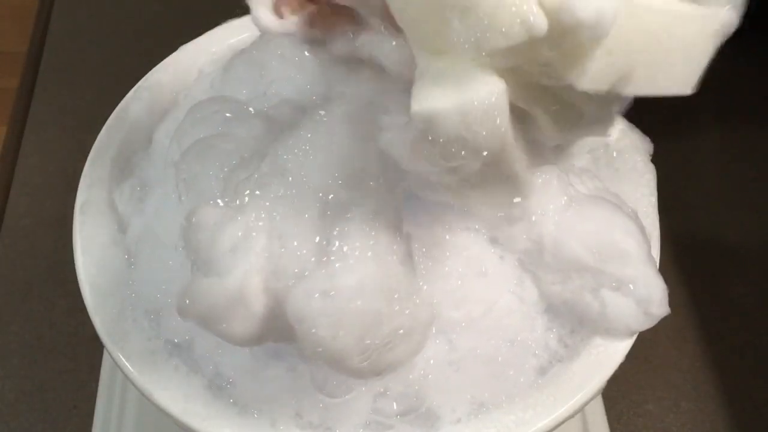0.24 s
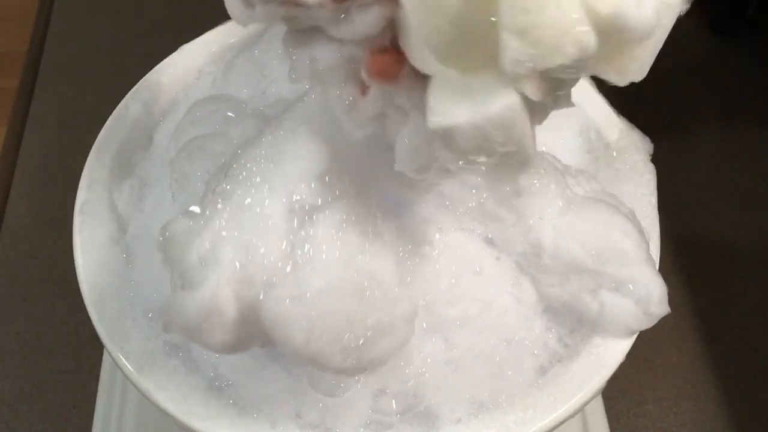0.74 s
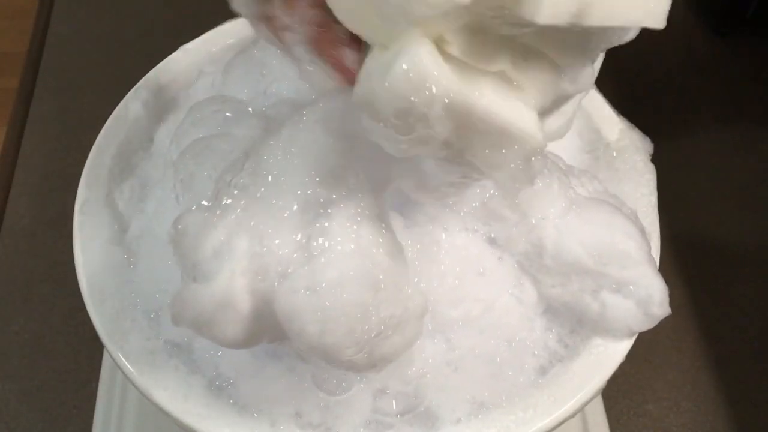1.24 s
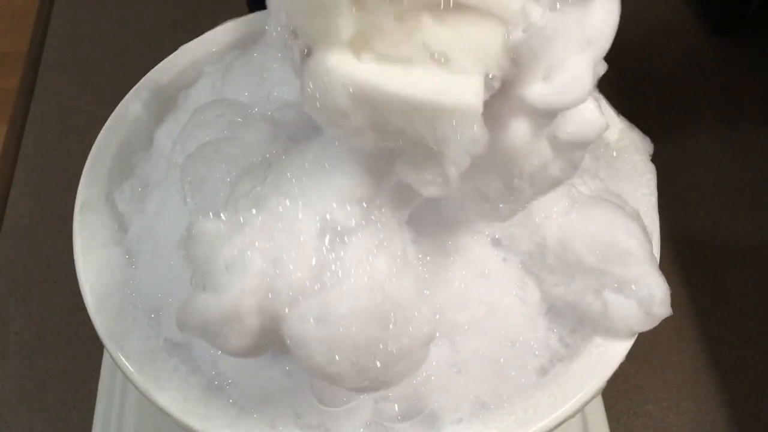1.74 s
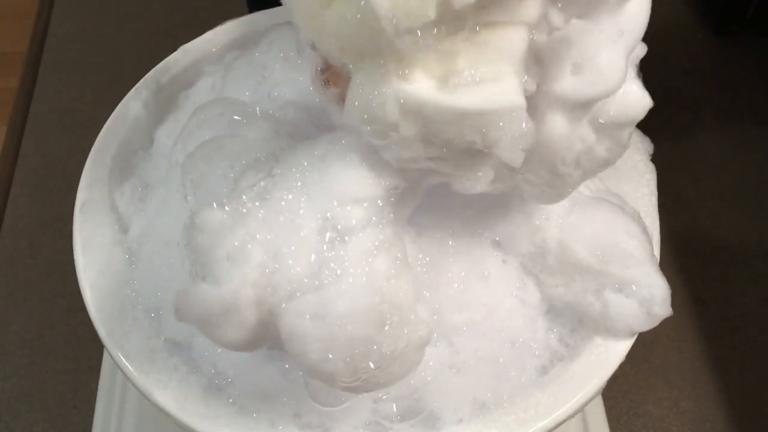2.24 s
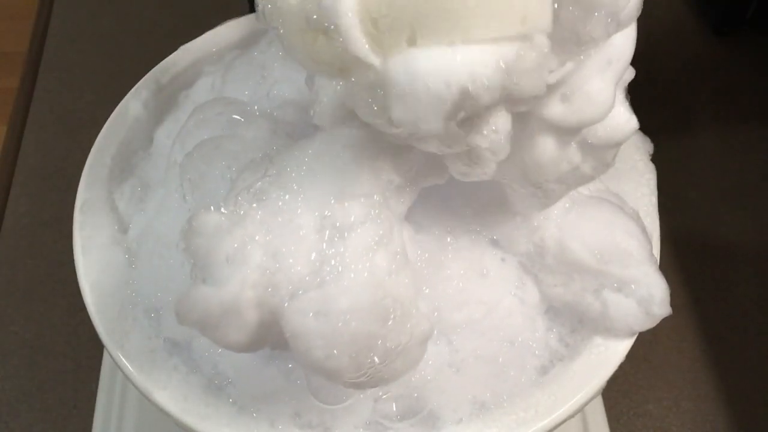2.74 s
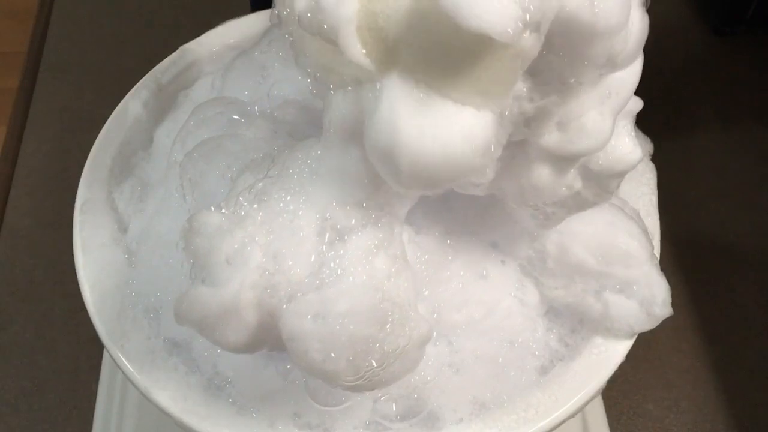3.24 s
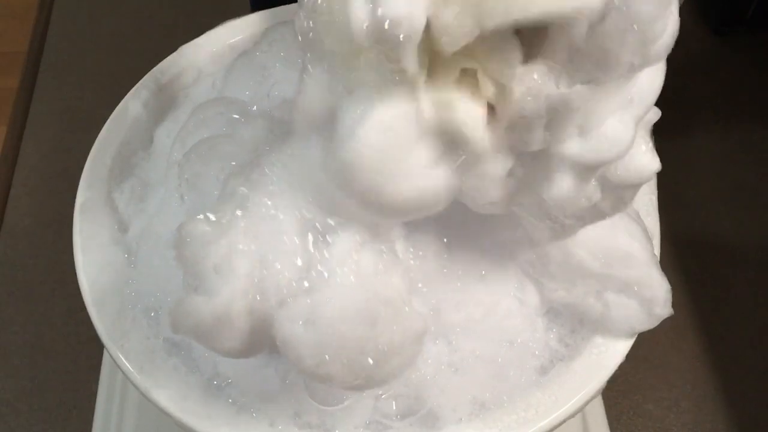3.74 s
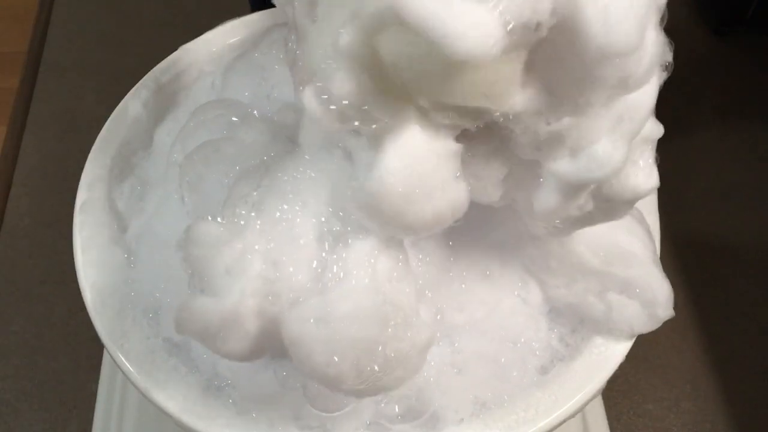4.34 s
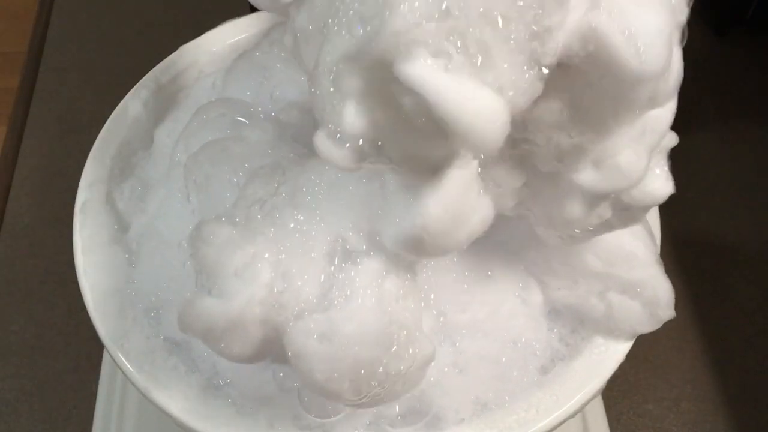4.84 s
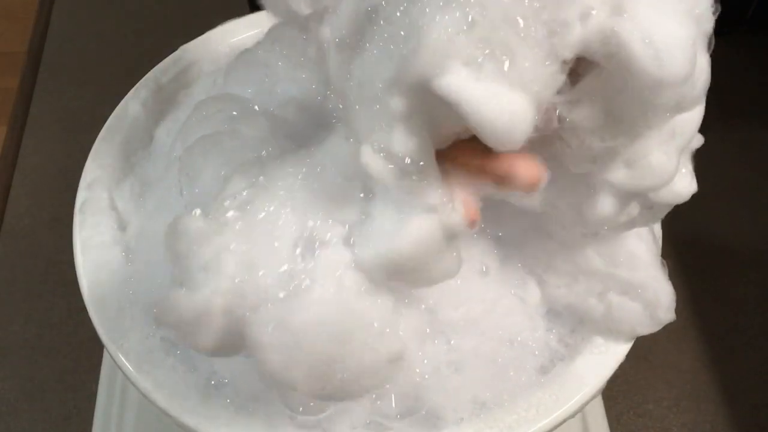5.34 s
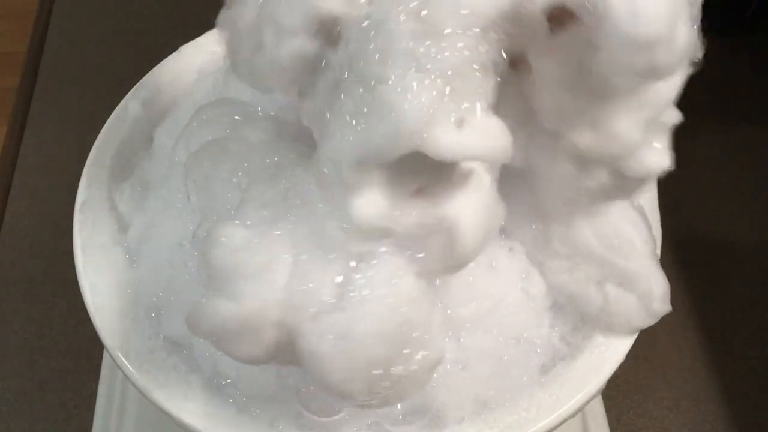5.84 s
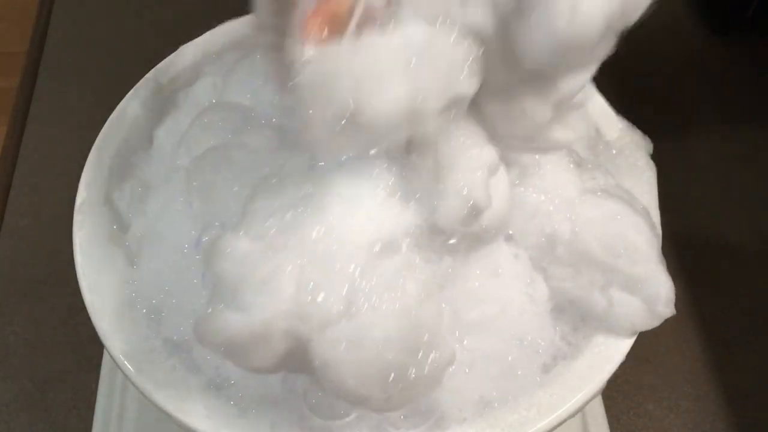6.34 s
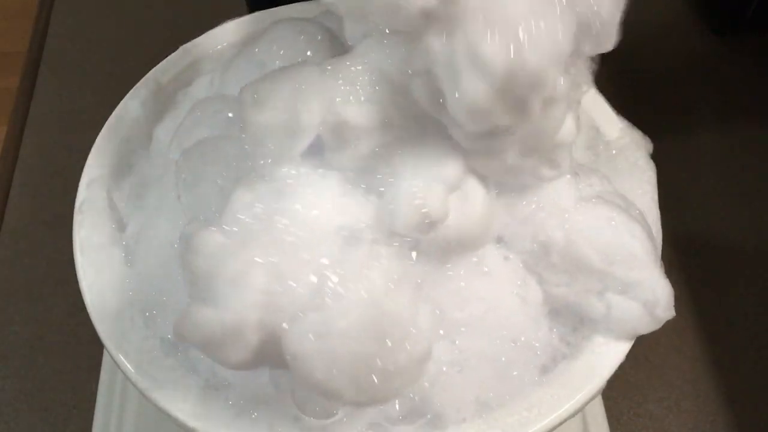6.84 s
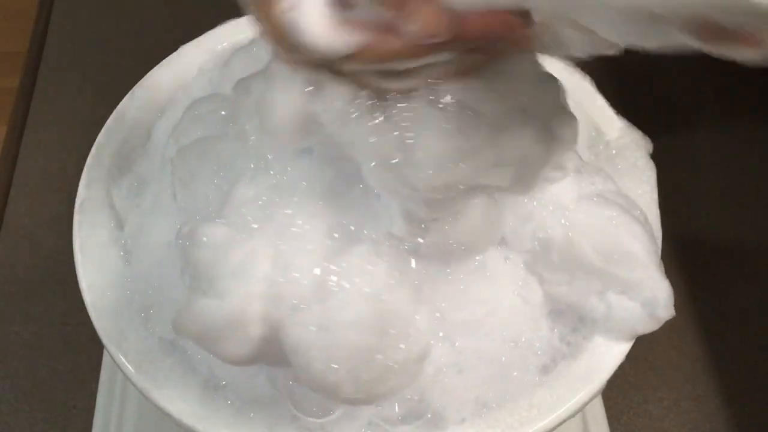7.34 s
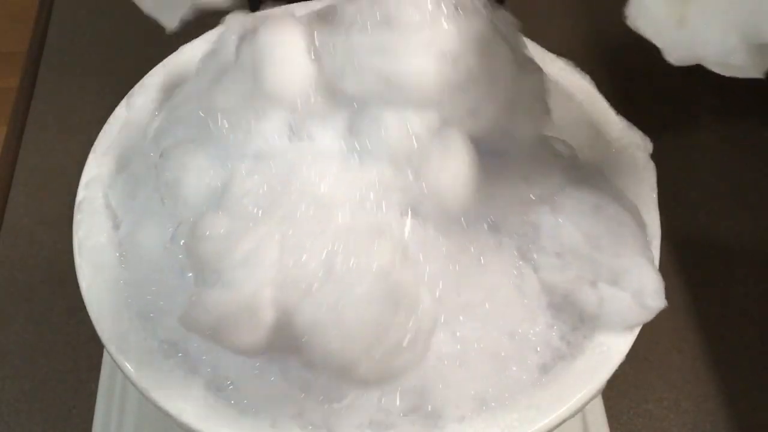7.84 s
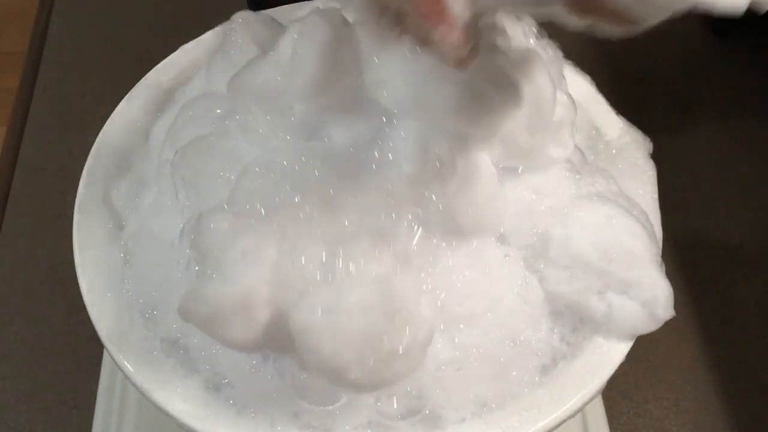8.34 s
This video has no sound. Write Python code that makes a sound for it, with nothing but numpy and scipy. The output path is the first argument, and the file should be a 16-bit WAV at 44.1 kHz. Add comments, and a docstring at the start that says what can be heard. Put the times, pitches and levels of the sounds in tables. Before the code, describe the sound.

Hand kneading a soaked sponge in thick lather up close, fizzing foam, wet squelches, scattered bubble pops and sharp clicks over a faint low hum.

```python
"""A hand kneads a wet sponge in thick lather, close by, while a machine hums from start to end.
From the first moment tiny bubbles burst as a bright fizz, suds squelch through the pores, and the grip thuds
softly; quick trains of small pops soon flutter or sing. Then air pockets pop one by one, and jets of foam hiss.
Later, hollows plop. The densest pops come at about 3.4 and 4.5 s; the last two seconds have few pops.
Bubbles are coloured random clicks, pockets are short ringing tones, and the hum is two sine waves."""
import sys
import numpy as np
from scipy import signal
from scipy.fft import rfft, irfft, next_fast_len
from scipy.io import wavfile
from scipy.ndimage import map_coordinates

SR = 44100
rng = np.random.default_rng(int(sys.argv[2]) if len(sys.argv) > 2 else 0)


def materialize(psi):
    """Save the field psi as 16-bit PCM at rate SR to the path in sys.argv[1].

    A 1-D psi becomes a single channel; in a 2-D psi each row is a channel.
    """
    bounded = np.clip(np.atleast_2d(psi).T, -1, 1)
    quanta = np.round(bounded * 32767).astype(np.int16)
    wavfile.write(sys.argv[1], SR, quanta)


N = 378819  # length in samples

# The machine's hum. Each row: time in seconds, level in dB.
HUM = [(0, -56.5), (4.3, -56), (4.4, -57.5), (7.55, -59), (7.65, -56.5), (8.59, -55.5)]
HUM_HZ = 59
# The sound colour of the quiet room. Each row: frequency in Hz, relative level in dB.
AIR_COLOUR = [(20, -5), (40, 0), (100, 4), (200, -1), (500, -6), (1300, -19), (3000, -26), (7600, -20),
              (15800, -13)]

# Squeezes of the hand. Each row: peak time in seconds, fine fizz level in dB, coarse froth level in dB,
# squelch level in dB, rise in seconds over 10 dB, fall in seconds over 10 dB (before DRAIN for the squelch).
SQUEEZES = [(0.021, -48, -54, -57, 0.079, 0.065), (.215, -52.5, -53, -54, 0.15, 0.16),
            (.37, -54.5, -54, -67, 0.07, 0.091), (.463, -53.5, -53.5, -57, 0.055, 0.21),
            (.587, -51.5, -49.5, -51, 0.044, 0.055), (.807, -57, -60.5, -62.5, 0.068, 0.22),
            (1.019, -62.5, -58.5, -65, 0.036, 0.12), (1.239, -50, -49.5, -52, 0.096, 0.063),
            (1.382, -59.5, -60, -56.5, 0.044, 0.082), (1.553, -57.5, -55.5, -53, 0.11, 0.14),
            (1.762, -64.5, -62, -60.5, 0.068, 0.085), (2.2, -64, -64, -66, 0.055, 0.21),
            (2.43, -56.5, -56.5, -62.5, 0.27, 0.18), (2.693, -58.5, -55, -64, 0.22, 0.36),
            (3.115, -62, -64.5, -60, 0.19, 0.33), (3.53, -84, -80, -51.5, 0.37, .3),
            (3.685, -50.5, -51, -48, 0.037, 0.046), (3.745, -67, -61, -56, .04, 0.18),
            (4.023, -65, -62, -55, 0.052, 0.47), (4.263, -53, -51.5, -58, 0.053, 0.077),
            (4.416, -53, -56.5, -54.5, 0.21, .1), (4.509, -47.5, -45, -39, 0.043, 0.049),
            (5.1, -80, -60.5, -51.5, 0.062, 0.11), (5.198, -58, -64, -51, 0.033, 0.057),
            (5.443, -61, -60.5, -55.5, 0.21, 0.039), (5.523, -70, -70, -51, 0.072, 0.11),
            (5.71, -79, -80, -51.5, 0.054, 0.26), (5.78, -65.5, -65.5, -54.5, .2, .4),
            (5.95, -54, -57.5, -72, 0.19, 0.14), (6.241, -59, -58.5, -56.5, 0.065, .3),
            (6.388, -69, -62.5, -51.5, 0.13, 0.18), (6.48, -49, -50, -50, 0.089, 0.22),
            (6.612, -43.5, -55, -54.5, 0.041, 0.053), (6.775, -58, -63, -58.5, 0.023, 0.076),
            (6.896, -57, -56.5, -53.5, 0.074, 0.094), (7.006, -54, -54, -54, 0.03, 0.021),
            (7.133, -48, -51, -54, 0.058, 0.063), (7.06, -69, -65, -54, 0.13, 0.11),
            (7.19, -51.5, -61, -64, 0.016, 0.044), (7.295, -62.5, -66.5, -59, 0.04, 0.058),
            (7.983, -63, -65.5, -67, 0.058, 0.062), (8.25, -64, -60.5, -59.5, 0.12, 0.084),
            (8.37, -62, -55.5, -63, 0.11, 0.091), (8.445, -56, -52, -54.5, 0.068, 0.072),
            (8.556, -56, -53, -53.5, 0.06, 0.053)]
DRAIN = 1.11  # the squelch takes this many times longer to fall than the foam
# The lather settling between squeezes. Each row: time in seconds, then the levels of fine fizz,
# coarse froth and squelch, all in dB.
SETTLE = [(0, -74, -57.5, -56.5), (1.7, -74, -74, -69.5), (2.0, -65.5, -64.5, -66.5),
          (2.12, -79, -70, -68.5), (3.6, -78, -71.5, -65), (4.4, -62, -69, -68), (4.57, -65, -59, -41),
          (4.67, -76.5, -71, -54), (5.02, -79, -76.5, -69), (5.7, -80, -74, -66), (6.75, -68.5, -75, -69.5),
          (7.36, -73, -75, -71), (7.42, -70, -71.5, -66), (7.7, -69.5, -74, -72), (7.93, -65.5, -70, -69.5),
          (8.06, -73.5, -76, -82), (8.59, -64, -68, -71)]
# The hand takes hold, and build-up before this is cut back. Each row: time in seconds.
GRABS = [(3.275,), (3.655,), (5.075,), (5.74,), (6.225,), (6.762,), (8.34,)]
GRAB_S = 0.013  # seconds for each 10 dB of this cut to lift
# The hand lets go, and what still oozes stops short. Each row: time in seconds.
RELEASES = [(0.26,), (1.292,), (3.555,), (3.85,), (4.56,), (6.4,), (6.5,), (6.645,), (7.198,), (7.31,),
            (8.005,)]
RELEASE_S = 0.025  # seconds for each further 10 dB lost after letting go

# The sound colours of fine foam, coarse froth and squelching suds.
# Each row: frequency in Hz, relative level in dB.
FIZZ_COLOUR = [(4120, -14), (7000, -4.5), (7660, -6.5), (9470, 0), (10400, -4.5), (12100, 0), (15600, -5)]
FROTH_COLOUR = [(1650, -5.5), (2800, 0.5), (4410, -1.5), (4910, -6), (5960, -1), (7200, -12.5), (9360, -41),
                (15800, -120)]
SQUELCH_COLOUR = [(260, -24), (450, -6.5), (495, -5.5), (766, -1.5), (927, -3.5), (1090, -1), (1350, -1),
                  (3000, -6), (3900, -12.5), (6600, -120)]
# Water-filled pores ring in a narrow range. Each row: frequency in Hz, relative level in dB.
PORE_COLOUR = [(500, -16), (900, -3), (1300, -2), (1900, -6), (3000, -13), (4500, -28.5)]
# How many pores are nearly shut and ring higher. Each row: time in seconds, share from 0 to 1.
SHUT = [(3.2, .1), (3.3, .95), (3.58, 0.9), (3.64, .1)]
SHUT_PITCH = 1.42  # their pitch, as a multiple of that of open pores

# The grip tightening. Each row: peak time in seconds, level in dB.
GRIPS = [(.255, -58.5), (.615, -58.5), (1.227, -57), (1.563, -59), (2.319, -64), (3.33, -67), (3.68, -56),
         (4.536, -56), (5.19, -60.5), (5.8, -58), (6.4, -67), (7.137, -60.5), (8.457, -62.5)]
GRIP_RISE_S, GRIP_FALL_S, GRIP_REST_DB = 0.09, 0.097, -70.5  # rise and fall each span 10 dB
# The sound colour of the grip's dull lumps. Each row: frequency in Hz, relative level in dB.
THUD_COLOUR = [(50, -26), (85, -2), (92, 1.5), (173, -3.5), (269, -1.5), (318, -4), (450, -5.5), (580, -50),
               (990, -120)]

# Quick trains of small pops: slow ones flutter like a wet slit, fast ones sing like a bubble.
# Each row: start in seconds, length in seconds, level in dB, average pops per second at the start,
# the same at the end, pitch in Hz.
POP_TRAINS = [(4.4388, 0.025, -20.5, 760, 520, 1320), (0.004, .018, -36.5, 500, 450, 1360),
              (5.8365, 0.013, -35, 800, 620, 1200), (4.499, .015, -28, 1450, 1250, 2700),
              (.0225, .011, -43.5, 1070, 1060, 1100), (6.606, .017, -47, 950, 850, 870)]
# Air pockets popping. Each row: time in seconds, level in dB, pitch in Hz, relative snap level in dB.
POPS = [(0.1114, -31, 2000, -6), (0.2756, -38, 4250, 0), (.597, -35, 1450, -6), (.611, -37.5, 900, -11),
        (0.7973, -35.5, 795, -8), (.855, -39.5, 1500, -8), (.926, -36.5, 3170, -5), (.958, -37, 3170, -5),
        (1.0132, -32, 1515, -4.5), (1.166, -36, 790, -12), (1.1958, -32, 1400, -2), (1.2063, -39, 1300, -6),
        (1.246, -33.5, 900, 5), (1.5702, -38.5, 950, -16), (1.6543, -37.5, 1180, -15),
        (2.057, -40.5, 1580, -3.5), (2.2936, -22, 2370, -5.5), (2.463, -40, 2050, -9),
        (3.198, -39, 1190, -17), (3.207, -36.5, 1160, -15), (3.2841, -28, 1810, -20),
        (3.291, -32, 1520, -22), (3.2984, -29, 1720, -18), (3.3046, -35, 1850, -15),
        (3.323, -28.5, 1800, -25), (3.33, -32.5, 1540, -21), (3.3596, -25.5, 1670, -30),
        (3.372, -37, 1420, -15), (3.38, -32, 1850, -21), (3.394, -27.5, 1870, -4.5),
        (3.4098, -34, 1500, -20), (3.411, -27, 2750, -9), (3.418, -35, 2300, -12), (3.424, -25, 2690, -16),
        (3.453, -29.5, 2600, -6), (3.4653, -34, 1540, -19), (3.4745, -25, 2520, -13),
        (3.497, -40, 1410, -9), (3.5045, -35, 1790, -17), (3.5425, -33, 1580, -20),
        (3.7398, -29, 2310, -11), (4.005, -38.5, 890, -22), (4.24, -33.5, 940, -2.5),
        (4.2653, -28, 4400, 1), (4.307, -35.5, 2330, 0), (4.361, -29, 1610, -11), (4.461, -27, 1050, -14),
        (4.4884, -25, 1120, -15), (4.493, -24, 1590, -20), (4.5233, -25, 1400, -12),
        (4.527, -21.5, 1250, -19), (4.5514, -17, 1340, -24), (4.5563, -24, 1530, -25),
        (4.579, -19.5, 1670, -18), (4.6118, -26, 1500, -10), (4.6288, -24, 1240, -26),
        (4.64, -32, 1580, -21), (4.6643, -34, 1250, -24), (5.1522, -35, 2970, -3), (5.1644, -33, 1700, -3),
        (5.1866, -29, 2330, -13), (5.1893, -30.5, 1200, -11), (5.438, -31.5, 1680, -11),
        (5.516, -37.5, 1400, -10), (5.5662, -36, 910, -26), (5.603, -35, 1570, -25),
        (5.621, -39.5, 905, -11), (5.6386, -34, 1570, -22), (5.672, -33, 1830, -12),
        (5.6775, -31.5, 1250, -18), (5.6971, -34, 1050, -9), (5.7053, -37, 1900, -20),
        (5.7518, -40, 1180, 1.5), (5.774, -30, 1140, -18), (5.779, -36, 1200, -21),
        (5.8327, -31, 1180, -18), (5.837, -25, 1200, -17), (5.986, -40.5, 796, -15),
        (6.0256, -38, 1150, -3), (6.2461, -35, 1400, -3.5), (6.769, -42, 1654, 0), (6.82, -38.5, 1080, -10),
        (7.144, -36, 1300, -5), (7.2204, -46, 2710, 2), (7.396, -43.5, 2200, -1.5),
        (7.4673, -40.5, 2020, -8), (7.8455, -46, 2850, -5), (7.989, -40, 2000, -5), (8.174, -45, 1570, 0),
        (8.4713, -35, 2260, -11)]
# Thin jets of foam spitting out. Each row: start in seconds, level in dB, fading time in seconds.
SPITS = [(.2742, -29.5, 0.0011), (4.2383, -34, 0.0025), (4.264, -28.5, 0.0045), (5.162, -38, .003),
         (5.9, -27, 0.00054), (6.0250, -31, .0006), (6.1502, -36.5, 0.0054), (6.7640, -36, 0.0034),
         (6.8187, -36, .002), (7.219, -40, .001), (7.891, -34, .0006), (8.125, -43, .001)]
# Hollows that plop, some at a nearly steady pitch, others sliding down. Each row: start in seconds, level in dB,
# first pitch in Hz, last pitch in Hz, sliding time in seconds, fading time in seconds.
PLOPS = [(2.2944, -23.5, 1470, 1460, .01, 0.0019), (2.2947, -27, 800, 760, .01, 0.0033),
         (2.2968, -34.5, 277, 85, 0.0054, 0.0098), (3.6618, -30.5, 1000, 290, 0.00095, .003),
         (5.1935, -38, 330, 200, .004, 0.0043), (5.782, -31.5, 920, 398, 0.0028, 0.0023),
         (5.792, -31.5, 905, 297, 0.0035, 0.0015), (1.25, -46, 90, 50, 0.025, 0.033)]

# How long the room rings. Each row: frequency in Hz, seconds to fall by 60 dB.
ROOM = [(200, 0.22), (1500, 0.15), (8000, 0.078)]
WET_DB = -12  # the walls' answer, against the direct sound
TOP_HZ = 15830  # the recorder keeps only what lies below this


def amp(db):
    """Turn decibels into a gain."""
    return 10 ** (np.asarray(db) / 20)


def unit(x):
    """Scale a sound to an average (rms) strength of 1."""
    return x / np.sqrt(np.mean(x ** 2) + 1e-20)


def along(points, hz):
    """Read a value between (Hz, value) points, with frequency on a log axis."""
    f, v = np.transpose(points)
    return np.interp(np.log(hz + 1), np.log(f + 1), v)


def curves(rows):
    """Give one value per sample for each column after the time."""
    s, *cols = np.transpose(rows)
    return [np.interp(np.arange(N) / SR, s, c) for c in cols]


def wobble(rate):
    """Draw a smooth random curve through `rate` random points a second."""
    knots = rng.standard_normal(int(N * rate / SR) + 4)
    return map_coordinates(knots, [np.arange(N) * rate / SR])


def filtered(x, response):
    """Strengthen or weaken each frequency of x by the given response."""
    m = next_fast_len(N + SR // 2)
    return irfft(rfft(x, m) * response(np.fft.rfftfreq(m, 1 / SR)), m)[..., :N]


def coloured(x, spectrum):
    """Give x a sound colour that fades out beyond its end points, at rms 1."""
    low, high = (spectrum[0][0] / 2, -120), (spectrum[-1][0] * 2, -120)
    closed = [low] + list(spectrum) + [high]
    return unit(filtered(x, lambda hz: amp(along(closed, hz))))


def machine():
    """A steady hum with a faint overtone at twice its pitch, and the hush of the room."""
    phase = 2 * np.pi * HUM_HZ * np.arange(N) / SR + .15 * wobble(4)
    level_db = curves(HUM)[0] + 0.37 * wobble(3.96)
    tone = np.sin(phase) + amp(-22.5) * np.sin(2 * phase)
    hum = np.sqrt(2) * amp(level_db) * tone
    hush = amp(-71.5) * coloured(rng.standard_normal(N), AIR_COLOUR)
    return hum + hush


def swell(s, db, rise, fall, grabs=(), releases=()):
    """The power of a push: straight up and down in dB, cut short outside the hand's hold."""
    t = np.arange(N)[::64] / SR  # every 64th sample is enough
    take = max([g for g, in grabs if g < s], default=0)
    let_go = min([r for r, in releases if r > s], default=N / SR)
    cut = np.maximum(take - t, 0) / GRAB_S + np.maximum(t - let_go, 0) / RELEASE_S
    slope = np.where(t < s, (s - t) / rise, (t - s) / fall)
    return amp(2 * (db - 10 * (slope + cut)))  # twice the dB turns gain into power


def summed_db(swells, rest_db):
    """Add the power of all pushes to the resting level, in dB for each sample."""
    power = np.interp(np.arange(N), np.arange(N)[::64], sum(swells))
    return 10 * np.log10(power + amp(2 * rest_db))


def kneading():
    """Levels of fizz, froth and squelch: every squeeze adds power over the settling lather."""
    def squeezed(column, rest_db, stretch=1):
        """One level column of the squeezes, its falls stretched, over its resting level."""
        swells = [swell(row[0], row[column], row[4], stretch * row[5], GRABS, RELEASES) for row in SQUEEZES]
        return summed_db(swells, rest_db)

    fizz, froth, squelch = curves(SETTLE)
    return squeezed(1, fizz), squeezed(2, froth), squeezed(3, squelch, DRAIN)


def crackle(count, spread_db):
    """Single bubbles bursting: `count` clicks a second of very uneven size."""
    draw = rng.random((int(count * N / SR), 3))
    sign = np.sign(draw[:, 2] - .5)
    size = amp(-spread_db * np.log(draw[:, 1] + 0.012)) * sign
    return unit(np.bincount((draw[:, 0] * N).astype(int), size, N))


def bursting(clicks, spectrum, share, clump_db, clump_rate):
    """Clicks on a bed of countless smaller bursts, in the colour of one bubble size."""
    share = np.clip(share, 0, 1)
    bed = np.sqrt(share) * clicks + np.sqrt(1 - share) * rng.standard_normal(N)
    # neighbours set each other off, so bursts come in clumps
    return coloured(bed * amp(clump_db * wobble(clump_rate)), spectrum)


def gurgle(count, hz, spread, turns):
    """Small bubbles, `count` a second, each ringing a few cycles at the pitch of its own size."""
    draw = rng.standard_normal((int(count * N / SR), 2))
    start = rng.integers(0, N, len(draw))[:, None]
    t = np.arange(SR // 100)
    cycles = hz * np.exp(spread * draw[:, :1]) * t / SR
    envelope = cycles * np.exp(-cycles / turns)
    rings = amp(3.2 * draw[:, 1:]) * np.sin(2 * np.pi * cycles) * envelope
    return unit(np.bincount((start + t).ravel(), rings.ravel())[:N])


def lather():
    """Bubble size sets the pitch: fine foam fizzes high, pore pockets squelch low."""
    fizz_db, froth_db, squelch_db = kneading()
    shared = amp(1.19 * wobble(40) + 1.2 * wobble(120))  # one push drives all sizes at once
    ticks = crackle(count=400, spread_db=3.5)  # a torn film ticks across the whole treble
    fizz = amp(fizz_db) * bursting(ticks, FIZZ_COLOUR, share=0.26, clump_db=1.1, clump_rate=82)
    froth = amp(froth_db) * bursting(ticks, FROTH_COLOUR, share=0.18, clump_db=1.0, clump_rate=90)

    clicks = crackle(count=300, spread_db=3)
    suds = bursting(clicks, SQUELCH_COLOUR, share=0.15, clump_db=0.5, clump_rate=35)
    suds = unit(suds + amp(-7.5) * gurgle(count=400, hz=1452, spread=0.352, turns=1.16))

    open_clicks = crackle(count=250, spread_db=3.5)
    pores = bursting(open_clicks, PORE_COLOUR, share=0.52, clump_db=0.0, clump_rate=60)
    tight_clicks = crackle(count=250, spread_db=4.0)
    tight_colour = [(hz * SHUT_PITCH, db) for hz, db in PORE_COLOUR]
    tight = bursting(tight_clicks, tight_colour, share=0.56, clump_db=1.0, clump_rate=60)
    shut = np.clip(curves(SHUT)[0], 0, 1)
    pores = np.sqrt(1 - shut) * pores + np.sqrt(shut) * tight

    # the more the squelch stands above the froth, the more it comes from inside the wet pores
    inside = np.clip((squelch_db - froth_db - 5.0) / 9, 0, .96)
    squelch = amp(squelch_db) * (np.sqrt(1 - inside) * suds + np.sqrt(inside) * pores)
    return (fizz + froth + squelch) * unit(shared)


def grip():
    """The wet mass shifts in the hand with dull lumps, made of low-coloured clicks and noise."""
    lumps = crackle(count=60, spread_db=3.0)
    swells = [swell(s, db, GRIP_RISE_S, GRIP_FALL_S) for s, db in GRIPS]
    level_db = summed_db(swells, GRIP_REST_DB)
    return amp(level_db) * bursting(lumps, THUD_COLOUR, share=0.19, clump_db=2.5, clump_rate=22)


def pop(hz, snap_db):
    """A pocket rings a cycle or two at its pitch, and its film tears with a snap."""
    t = np.arange(SR // 100) / SR
    turns = hz * t
    tone = np.sin(2 * np.pi * turns) + .35 * np.sin(2 * np.pi * 1.8 * turns)
    ring = tone * np.exp(-turns / 0.9) * (1 - np.exp(-(turns / 0.38) ** 2))
    snap_hz = 4100 * np.exp(0.15 * rng.standard_normal())
    snap = np.sin(2 * np.pi * snap_hz * t) * np.exp(-t / 0.0003) * (1 - np.exp(-t / .0001))
    return amp(5) * ring + amp(snap_db + 6.5) * snap


def pop_trains():
    """Quick trains of small pops: slow ones flutter like a wet slit, fast ones sing like a bubble."""
    out, t = np.zeros(N + SR), np.arange(SR // 16) / SR
    for s, length, db, first, last, hz in POP_TRAINS:
        rate = np.interp(t, [0, length], [first, last]) * (t < length)
        count = np.cumsum(rate * amp(1.7 * wobble(400)[:len(t)])) / SR
        # a pop falls wherever the running count reaches a new whole number
        for i in np.flatnonzero(np.diff(count // 1, prepend=-1)):
            bulge = -4 * abs(2 * t[i] / length - .8) + rng.normal(0, 1.3)  # strongest near the middle
            out[round(s * SR) + i:][:SR // 100] += amp(db + bulge) * pop(hz, -16)
    return out[:N]


def pops():
    """Air pockets burst one by one, each ringing at its own pitch."""
    out = np.zeros(N + SR)
    for s, db, hz, snap_db in POPS:
        out[round((s - .0003) * SR):][:SR // 100] += amp(db) * pop(hz, snap_db)
    return out[:N]


def spits():
    """Thin jets of foam: short bright noise hisses with a hard start."""
    out, t = np.zeros(N + SR), np.arange(SR // 40) / SR
    for s, db, life in SPITS:
        hiss = np.diff(rng.standard_normal(len(t) + 1))  # differences of noise sound brighter
        out[round(s * SR):][:len(t)] += amp(db - 9) * np.exp(-t / life) * hiss
    return out[:N]


def plops():
    """Some hollows ring at a nearly steady pitch, others slide down; a fainter pop marks each start."""
    out, t = np.zeros(N + SR), np.arange(SR // 16) / SR
    for s, db, first_hz, last_hz, slide, life in PLOPS:
        pitch = last_hz + (first_hz - last_hz) * np.exp(-t / slide)
        tone = np.sin(2 * np.pi * np.cumsum(pitch) / SR)
        out[round(s * SR):][:len(t)] += amp(db) * np.exp(-t / life) * tone
        out[round(s * SR):][:SR // 100] += amp(db - 15) * pop(first_hz, -2)
    return out[:N]


def room(x):
    """The walls answer a moment later, and each frequency dies away at its own speed."""
    hz, t, z = signal.stft(rng.standard_normal(SR // 4), SR, nperseg=256)
    fade = amp(-60 * t / along(ROOM, hz)[:, None])
    tail = signal.istft(z * fade, SR, nperseg=256)[1]
    delayed = np.pad(x, (100, 0))  # 100 samples late
    return signal.fftconvolve(delayed, tail / np.linalg.norm(tail))[:N]


def scene():
    """Foam, pockets and grip close by, over the hum; only the pockets get an answer from the walls."""
    pockets = pop_trains() + pops() + plops()
    # small sources radiate no deep bass
    near = filtered(pockets, lambda hz: (1j * hz / (60 + 1j * hz)) ** 2)
    echo = amp(WET_DB) * room(near)
    return (machine() + lather() + grip() + near + echo + spits())[None]


def record(dry):
    """The recorder keeps nothing above its band limit."""
    return filtered(dry, lambda hz: hz < TOP_HZ)


dry = scene()
out = record(dry)
materialize(out)
```